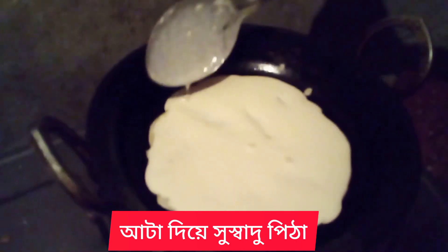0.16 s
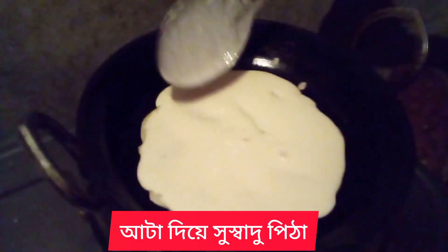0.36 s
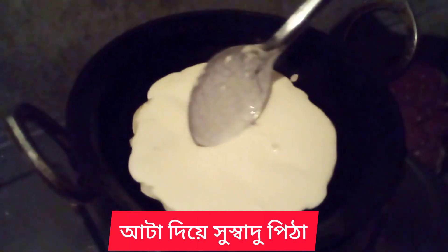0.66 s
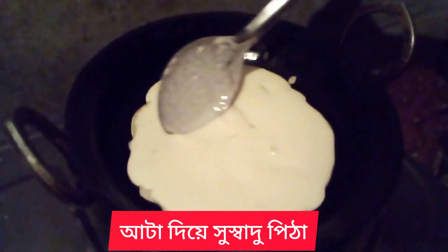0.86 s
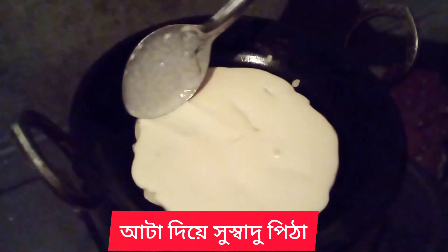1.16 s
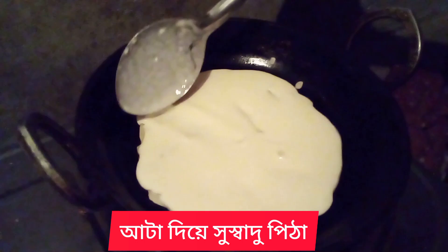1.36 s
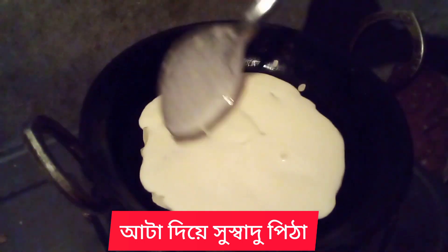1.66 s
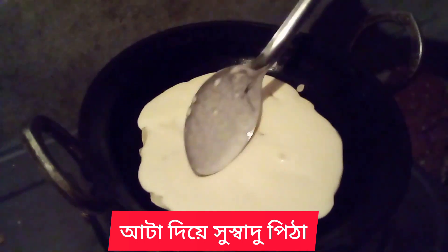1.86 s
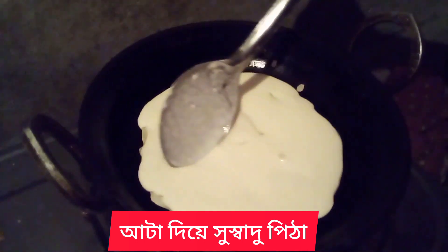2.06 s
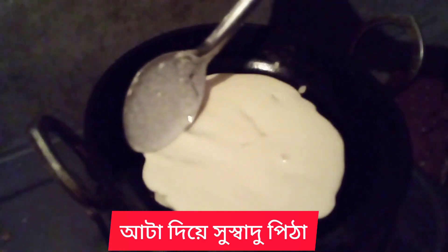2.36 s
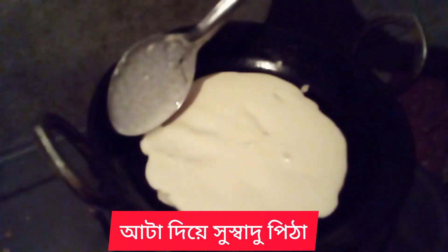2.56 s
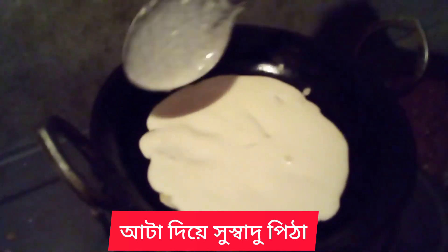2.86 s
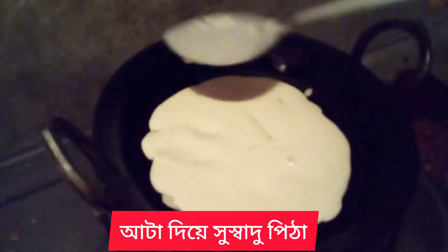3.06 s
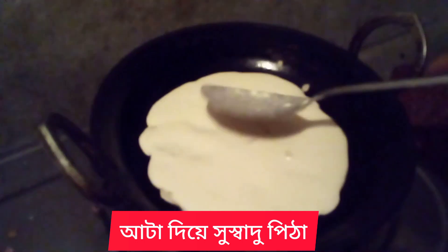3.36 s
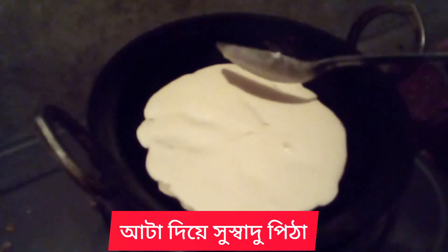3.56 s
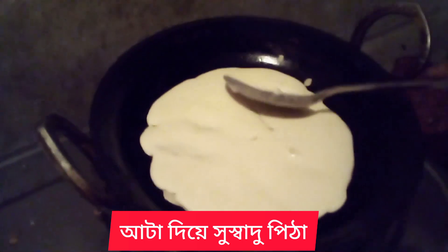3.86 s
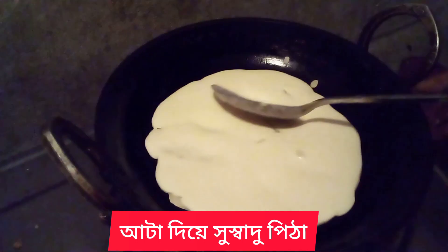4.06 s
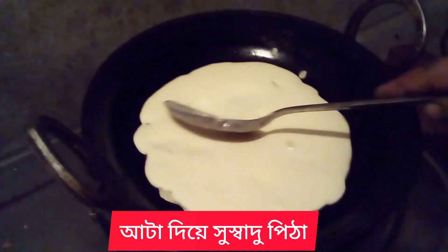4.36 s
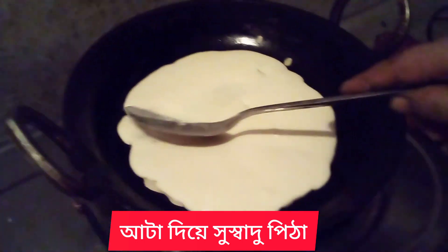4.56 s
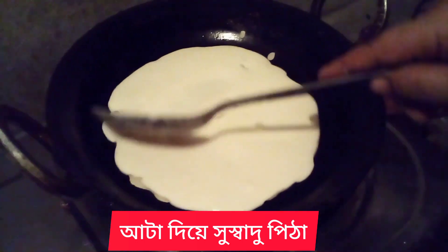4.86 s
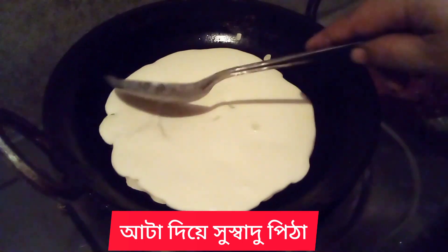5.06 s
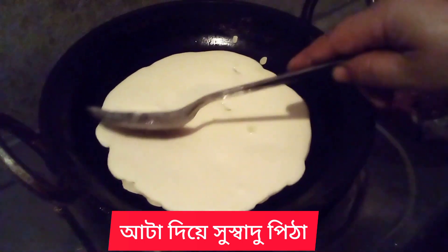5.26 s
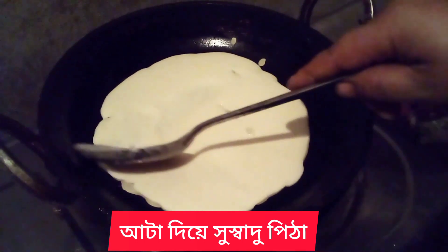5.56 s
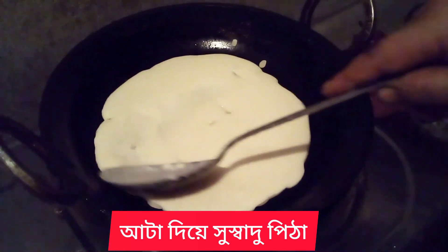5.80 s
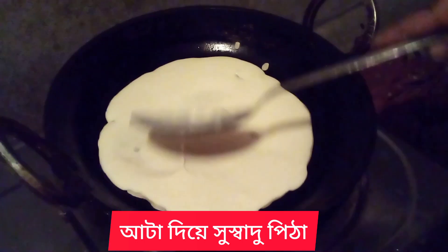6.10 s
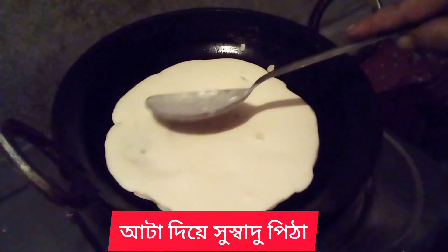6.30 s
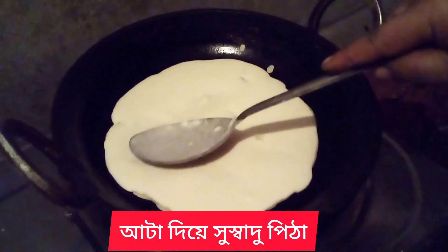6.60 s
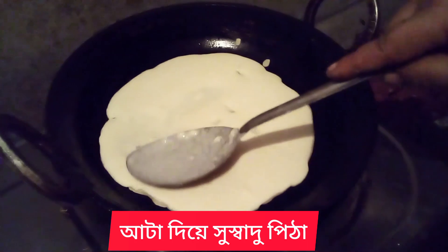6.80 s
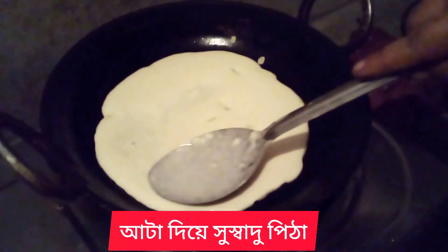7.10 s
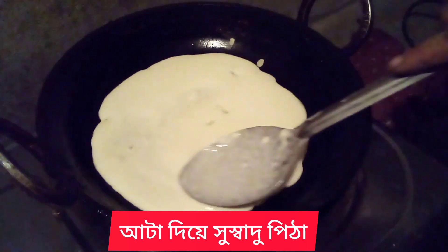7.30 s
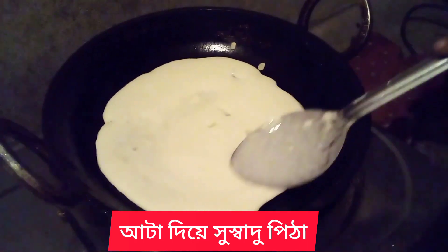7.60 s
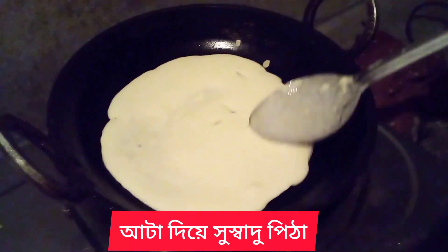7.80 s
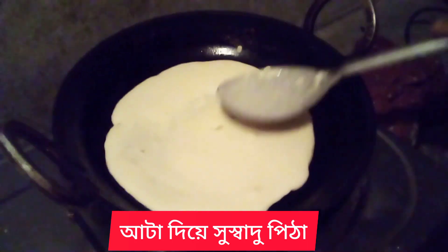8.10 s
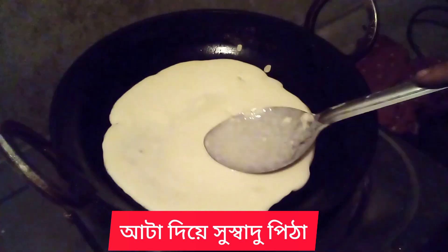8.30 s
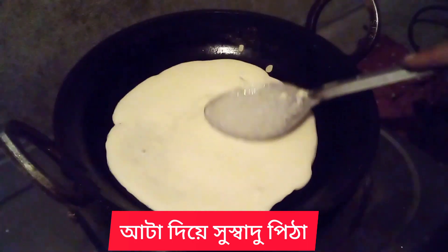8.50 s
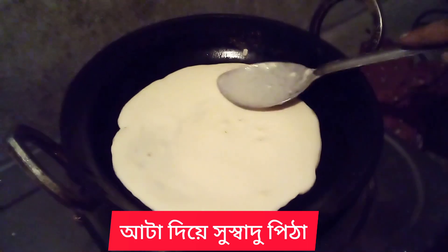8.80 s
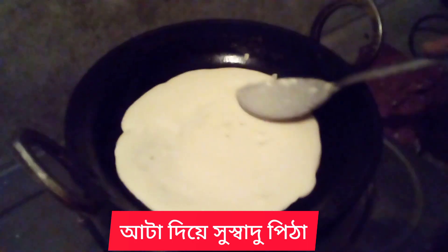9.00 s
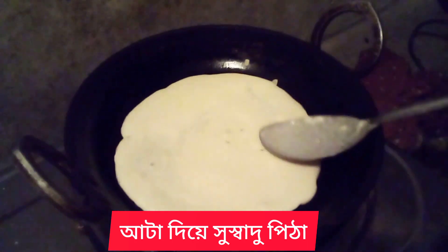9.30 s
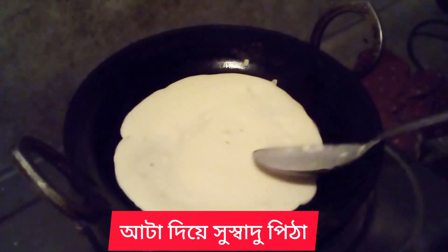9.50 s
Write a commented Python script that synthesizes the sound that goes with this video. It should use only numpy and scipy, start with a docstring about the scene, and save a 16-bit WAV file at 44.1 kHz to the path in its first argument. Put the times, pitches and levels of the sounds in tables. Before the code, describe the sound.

Close to an iron pan in a small kitchen, batter hisses in waves each time its wet edge is spread onto hot metal. The first few surges give way to a softer stretch of crackling, before the sizzle returns in several more swells. Single droplets snap and small bubbles tick and faintly ring the iron. A soft low rumble of room air lies underneath.

```python
"""Thin batter frying in an iron pan

A small kitchen, one microphone close to the hot pan, while a spoon pushes the batter outwards.
Each time the wet edge reaches bare metal, tiny steam bubbles burst in a surge that thins to a crackle.
Larger bubbles ring the iron and single droplets spit; under it all lie low room noise and a soft rumble."""
import sys
import numpy as np
from scipy import signal
from scipy.fft import rfft, irfft, next_fast_len
from scipy.io import wavfile
from scipy.ndimage import map_coordinates

SR = 44100
rng = np.random.default_rng(int(sys.argv[2]) if len(sys.argv) > 2 else 0)


def wav_record(signal):
    """Record a signal, one row per channel, as 16-bit PCM in the file named by sys.argv[1]."""
    frames = np.transpose(np.atleast_2d(signal))
    bounded = np.clip(frames, -1, 1)
    # unit amplitude maps onto the largest positive 16-bit level
    quanta = np.round(bounded * 32767).astype(np.int16)
    wavfile.write(sys.argv[1], SR, quanta)


N = 425565

# quiet frying between the surges: time_s, level_db, spray_relative_db, crackle_relative_db
QUIET_FRYING = [(0, -34, 1, -1.5), (0.95, -37, -0.5, -3.5), (1.17, -42, 0, -4), (2.35, -41.5, 3.5, -1),
                (3.05, -36.5, 2.5, -2.5), (3.6, -39, -3, -2.5), (4.3, -39.5, 0, -1.5),
                (4.55, -44.5, -1.5, -4), (6.85, -48.5, 1.5, -5), (9.65, -45.5, 2, -4.5)]


def amp(db):
    """Decibels to gain."""
    return 10 ** (np.asarray(db) / 20)


def unit(x):
    """Scale to rms 1."""
    return x / np.sqrt(np.mean(x ** 2) + 1e-20)


def curves(rows):
    """One value per sample for each column after the time."""
    time_s, *columns = np.transpose(rows)
    return [np.interp(np.arange(N) / SR, time_s, column) for column in columns]


def wobble(knots_per_s):
    """A smooth random curve at rms 1."""
    knots = rng.standard_normal(int(N * knots_per_s / SR) + 4)
    return unit(map_coordinates(knots, [np.arange(N) * knots_per_s / SR]))


def swell(x, centre_s, width_s):
    """x at rms 1, swelling and fading under a bell curve."""
    return np.exp(-0.5 * ((np.arange(N) / SR - centre_s) / width_s) ** 2) * unit(x)


def filtered(x, response):
    """x through a filter whose gain is a function of frequency."""
    size = next_fast_len(N + SR // 2)
    return irfft(rfft(x, size) * response(np.fft.rfftfreq(size, 1 / SR)), size)[:N]


def band(x, pitch_hz, width_hz):
    """The part of x around one pitch."""
    return filtered(x, lambda hz: 1 / (1 + (2 * (hz - pitch_hz) / width_hz) ** 4))


def coloured(x, points, size=8192):
    """Causal filter through (frequency_hz, gain_db) points, so that clicks keep their sharp front."""
    point_hz, point_db = np.transpose(points)
    hz = np.fft.rfftfreq(size, 1 / SR)
    gain = amp(np.interp(np.log(hz + 1), np.log(point_hz + 1), point_db))
    cepstrum = irfft(np.log(gain))
    cepstrum[1:size // 2] *= 2  # fold to minimum phase
    cepstrum[size // 2 + 1:] = 0
    return signal.fftconvolve(x, irfft(np.exp(rfft(cepstrum))))[:N]


def bursts(per_second, spread_db):
    """Bursting bubbles: random clicks of unequal size, with the same mean power at any rate."""
    chance = np.clip(per_second / SR, 1e-4, 1)
    sizes = amp(spread_db * np.clip(rng.standard_normal(N), -3, 2.25))
    hits = rng.random(N) < chance
    return unit(hits * sizes * rng.choice([-1, 1], N) / np.sqrt(chance))


def echoes(x, t60_s, wet_db, size=2048):
    """Direct sound plus dying reflections; bubbles burst all over the pan, so the pattern keeps changing."""
    t = np.arange(SR // 5) / SR
    blocks = np.pad(x, (0, -N % size)).reshape(-1, size)
    envelope = amp(-60 * t / t60_s) * (1 - np.exp(-t / 0.00056))
    tails = rng.standard_normal((len(blocks), len(t))) * envelope
    tails /= np.linalg.norm(tails, axis=1, keepdims=True)
    wet = signal.fftconvolve(blocks, tails, axes=1)
    positions = size * np.arange(len(blocks))[:, None] + np.arange(wet.shape[1])
    return x + amp(wet_db) * np.bincount(positions.ravel(), wet.ravel())[:N]


def boiling():
    """Levels in dB of hiss, finest spray and large bubbles: surges rise, hold and fade over quiet frying."""
    # wet batter reaches bare metal:
    # start_s, rise_s, hold_s, level_db, fade_db_per_s, spray_relative_db, large_relative_db
    surges = [(-0.15, 0.29, 0.048, -29, 35, 5, -11), (0.158, 0.14, 0.077, -33.5, 64, 5.5, -28),
              (1.225, 0.023, 0.25, -37.5, 58, 4.5, -27), (1.284, 0.13, 0.15, -29.5, 19, -2.5, -14.5),
              (2.213, 0.038, 0.028, -39.5, 67, 3.5, -7), (2.453, 0.41, 0.04, -29.5, 89, 5, -16.5),
              (2.615, 0.047, 0.015, -37, 116, 11, -11), (4.098, 0.17, 0.077, -52, 52, 13, -16),
              (5.396, 0.013, 0.025, -40, 122, 3, -13), (5.463, 0.3, 0.065, -28.7, 40.5, 3.5, -16),
              (6.971, 0.12, 0.16, -32, 22, 4.5, -17), (7.121, 0.06, 0.043, -28, 102, 4.5, -35),
              (7.582, 0.062, 0.043, -33, 23.5, 6, -17.5), (8.236, 0.033, 0.045, -39, 70, 4, -20),
              (8.933, 0.0099, 0.044, -23.5, 30, 0, -25), (9.049, 0.0046, 0.024, -24, 56, 2, -25),
              (9.19, 0.013, 0.015, -33.5, 68, 6.5, -15.5)]
    rise_exponent, spray_exponent, large_exponent = 0.55, 1.26, 0.81
    simmer_db, setting_db_per_s = -45, 1.63  # large bubbles die down as the batter sets
    t = np.arange(N) / SR
    frying_db, fine_db, _ = curves(QUIET_FRYING)
    hiss, spray, large = amp([frying_db, frying_db + fine_db, simmer_db - setting_db_per_s * t]) ** 2
    for start_s, rise_s, hold_s, level_db, fade_db_per_s, spray_relative_db, large_relative_db in surges:
        on = t > start_s
        age_s = t[on] - start_s
        rise = np.minimum(age_s / rise_s, 1) ** rise_exponent
        fade = amp(-fade_db_per_s * np.maximum(age_s - rise_s - hold_s, 0))
        power = (rise * fade) ** 2
        hiss[on] += amp(level_db) ** 2 * power
        spray[on] += amp(level_db + spray_relative_db) ** 2 * power ** spray_exponent
        large[on] += amp(level_db + large_relative_db) ** 2 * power ** large_exponent
    return 10 * np.log10([hiss, spray, large])


def sizzle(level_db, spray_relative_db):
    """Hard boiling merges tiny steam bursts into a hiss; as it calms, single crackles stand out."""
    # colour of each side of the pan at the microphone: frequency_hz, gain_db
    far = [(1500, -33), (2300, -11), (3220, -9), (3450, 0), (3660, -2.5), (4200, -1), (4950, -4.5),
           (6550, 0), (7120, 3.5), (7700, -2.5), (9500, -6.5), (12000, -10), (14600, -6.5), (15800, -7.5)]
    left = [(1500, -21.5), (2200, -18), (3150, -12), (3650, -4), (4900, -6), (5800, -4), (7100, 2),
            (7900, -3), (8700, -5.5), (9700, -4.5), (12600, -3.5), (14500, -0.5), (15800, -4.5)]
    near = [(1500, -20.5), (2800, -11.5), (3700, -2), (4700, -5), (7300, -1), (8400, -1.5), (9900, 0),
            (14000, 1.5), (15800, 0.5)]
    right = [(1500, -14), (2800, -1), (3600, 6.5), (4300, 5), (5000, -2.5), (6100, -2.5), (6900, 2),
             (8800, 3.5), (10500, -2.5), (12500, -3.5), (14300, 0), (15800, -0.5)]
    rear_right = [(1800, -43), (2400, -19), (2600, -9.5), (3200, -11), (3650, -4.5), (4300, -7),
                  (5200, -9.5), (6700, -5), (7400, 2), (9200, -1), (10400, -9.5), (12500, -7.5),
                  (14400, -10.5), (15600, -17.5)]
    # where the batter meets bare metal: time_s, side (0 far, 1 left, 2 near, 3 right, 4 rear right)
    wet_edge = [(0, 0), (5.3, 0), (5.5, 1), (6.95, 1), (7.15, 2), (8.1, 2), (8.28, 3), (8.925, 3),
                (8.94, 4)]
    vigour_db = level_db + 35
    hard_boil_db = np.maximum(vigour_db, 0)
    fizz = bursts(24000 * amp(vigour_db), spread_db=4.5 - 0.0091 * hard_boil_db)
    crackle = bursts(1600 * amp(vigour_db), spread_db=8)
    # the sharpest bursts are the brightest
    crackle = unit(coloured(crackle, [(1500, -8.0), (4000, -1.5), (8000, -1.5), (13000, 1.0)]))
    crackle_db = curves(QUIET_FRYING)[-1] - 0.3 * hard_boil_db
    clicks = echoes(fizz + amp(crackle_db) * crackle, t60_s=0.025, wet_db=-10)
    edge_side, = curves(wet_edge)
    body, spray = np.zeros(N), np.zeros(N)
    for side, colour in enumerate([far, left, near, right, rear_right]):
        share = np.clip(1 - abs(edge_side - side), 0, 1)
        sound = coloured(clicks, colour)
        treble = filtered(sound, lambda hz: 1 / (1 + (10000 / (hz + 1)) ** 16))  # above 10 kHz
        body += share * unit(sound - treble)
        spray += share * unit(treble)
    clusters_db = 0.5 * wobble(45)  # bubbles burst in clusters
    body *= amp(-0.89 + 0.69 * wobble(70))
    spray *= amp(spray_relative_db + 1.04 * wobble(70))
    return amp(level_db + clusters_db) * (body + spray)


def simmer(level_db):
    """Larger bubbles break under the batter, sound in the bowl of the pan and make its iron ring."""
    # colour of large bubbles in the bowl: frequency_hz, gain_db
    bowl = [(150, -20.5), (400, -13.5), (660, -8.5), (740, -12.5), (880, -22.5), (1000, -9.5), (1480, -5.5),
            (2300, -2.5), (3500, -4.5), (5000, -62)]
    # resonances of the filled pan: pitch_hz, gain_db
    pan_modes = [(590, -3), (680, -7.5), (980, 0.5), (1105, -3), (1410, 2.5), (1535, 5.5), (1700, 0.5),
                 (1835, 0), (2155, -2), (2593, 2), (3010, 4), (3440, 6)]
    loss = 0.029  # width of each resonance as a share of its frequency

    def iron(hz):
        """The summed response of the damped resonances."""
        return sum(amp(gain_db) * 1j * hz * loss * pitch_hz
                   / (pitch_hz ** 2 - hz ** 2 + 1j * hz * loss * pitch_hz)
                   for pitch_hz, gain_db in pan_modes)

    bubbles = echoes(bursts(4000, spread_db=4), t60_s=0.17, wet_db=1)
    ring = filtered(bursts(3000, spread_db=5.5), iron)
    return amp(level_db) * (amp(-2.5) * unit(coloured(bubbles, bowl)) + amp(-3.5) * unit(ring))


def room_noise():
    """A low murmur of air, with a few soft rumbling swells and a hum that rises and fades twice."""
    # colour of the kitchen air: frequency_hz, gain_db
    air_colour = [(20, -40), (36, -21.5), (52, 5), (66, -6.5), (85, 3.5), (105, -1.5), (150, -4.5),
                  (260, -9), (380, -6.5), (600, -11.5), (800, -18), (1100, -12.5), (2500, -27)]
    # loudness of that air: time_s, level_db
    air_level = [(0, -55.5), (3, -55), (5.0, -57), (7, -56.5), (9.1, -56), (9.5, -64.5), (9.65, -71.5)]
    # soft low swells: centre_s, width_s, level_db, pitch_hz, width_hz
    rumbles = [(1.9, 0.08, -59, 290, 380), (3.75, 0.4, -53, 88, 105), (3.61, 0.09, -52.5, 270, 600),
               (4.05, 0.06, -47.5, 300, 700), (5.28, 0.1, -59, 365, 85), (6.65, 0.15, -64, 385, 70)]
    # brief low hums: start_s, level_db
    hums = [(3.485, -45.5), (4.0, -60)]
    hum_hz, rise_s, fade_db_per_s = 85.6, 0.089, 33
    air_db, = curves(air_level)
    out = amp(air_db) * unit(coloured(rng.standard_normal(N), air_colour))
    for centre_s, width_s, level_db, pitch_hz, width_hz in rumbles:
        rumble = band(rng.standard_normal(N), pitch_hz, width_hz)
        out += amp(level_db) * swell(rumble, centre_s, width_s)
    hum = unit(np.sin(2 * np.pi * np.cumsum(hum_hz + 3.6 * wobble(18)) / SR))
    for start_s, level_db in hums:
        age_s = np.arange(N) / SR - start_s
        rise = np.clip(age_s / rise_s, 0, 1)
        out += rise * amp(level_db - fade_db_per_s * np.maximum(age_s - rise_s, 0)) * hum
    return out


def pitched_sizzle():
    """The sizzle gathers briefly around one pitch, which wanders as the batter flows: bubbles of like size
    burst together, or one of the pan's resonances sounds out more strongly for a while."""
    # brief gatherings of the sizzle around one pitch (like-sized bubbles, or a pan resonance sounding out):
    # centre_s, width_s, level_db, pitch_hz
    pitch_bands = [(0.11, 0.074, -43, 2100), (0.17, 0.22, -35.5, 8300), (0.918, 0.17, -47, 4100),
                   (1.487, 0.14, -46, 2180), (1.686, 0.2, -42, 2990), (1.77, 0.18, -38.5, 5200),
                   (2.827, 0.051, -33.5, 6100), (3.8, 0.83, -58.5, 1440), (5.425, 0.014, -41.5, 5840),
                   (6.5, 0.44, -55.5, 3760)]
    drift_octaves = 0.05
    out = np.zeros(N)
    for centre_s, width_s, level_db, pitch_hz in pitch_bands:
        position = np.cumsum(2 ** (drift_octaves * wobble(9))) % N
        bubbles = band(bursts(5000, spread_db=1), pitch_hz, width_hz=0.27 * pitch_hz)
        drifting = np.interp(position, np.arange(N), bubbles)
        out += amp(level_db) * swell(drifting, centre_s, width_s)
    return out


def spits():
    """Each droplet or single bubble snaps, rings briefly and throws a puff of spray around its pitch."""
    # spitting droplets: start_s, snap_peak_db, pitch_hz
    droplets = [(1.0062, -7, 12700), (2.015, -14, 14000), (2.2263, -14, 15000), (2.4403, -16.5, 7500),
                (2.4605, -7.5, 6950), (2.4607, -6.5, 14000), (2.6735, -6, 14200), (3.0952, -13.5, 8050),
                (3.538, -13, 12500), (4.9548, -27, 13000), (5.0936, -24, 8000), (5.2032, -25, 14000),
                (5.3873, -16, 13000), (5.399, -18, 13000), (5.4225, -12, 14500), (5.4486, -13, 14000),
                (6.0298, -12.5, 14500), (6.1098, -22, 9000), (6.234, -22, 12400), (6.4375, -24, 13000),
                (6.458, -18, 13500), (6.881, -24, 10000), (8.4117, -13, 14000)]
    # single bubbles that burst with a pitched tick: start_s, snap_peak_db, pitch_hz
    pings = [(0.7576, -18, 6060), (0.7582, -15, 15200), (2.015, -20, 5960), (3.9841, -15.5, 11400),
             (4.6442, -19, 15400), (8.4218, -25, 4100), (8.7947, -26.5, 5230)]
    droplet_cycles, ping_cycles = 0.72, 4.2  # decay times of the ring
    puff_db, puff_tilt_db = -6.5, 4  # the tilt is the drop one octave from the pitch
    out, t = np.zeros(N + SR), np.arange(SR // 25) / SR
    hz = np.fft.rfftfreq(len(t), 1 / SR)
    highpass = signal.butter(3, 2400, "high", fs=SR, output="sos")
    puff_decay = np.exp(-t / 0.00064) + amp(-15.5) * np.exp(-t / 0.015)
    puff_envelope = puff_decay * (1 - np.exp(-t / 0.000089))
    snap_attack = 1 - np.exp(-t / 0.00005)
    for events, cycles in [(droplets, droplet_cycles), (pings, ping_cycles)]:
        for start_s, snap_peak_db, pitch_hz in events:
            ring = np.sin(2 * np.pi * pitch_hz * t) * np.exp(-t * pitch_hz / cycles)
            snap = signal.sosfilt(highpass, ring * snap_attack)
            puff_colour = amp(-puff_tilt_db * np.log2((hz + 1) / pitch_hz) ** 2)
            puff = unit(irfft(rfft(rng.standard_normal(len(t))) * puff_colour, len(t)))
            spit = snap / abs(snap).max() + amp(puff_db) * puff_envelope * puff
            out[round(start_s * SR):][:len(t)] += amp(snap_peak_db) * spit
    return out[:N]


def scene():
    """The pan close up in a small kitchen; one microphone feeds both channels."""
    hiss_db, spray_db, large_db = boiling()
    pan = sizzle(hiss_db, spray_db - hiss_db) + pitched_sizzle() + simmer(large_db) + spits()
    kitchen = echoes(pan, t60_s=0.4, wet_db=-10) + room_noise()
    return np.tile(kitchen, (2, 1))


def record(dry):
    """The recorder keeps nothing above its band limit."""
    top_hz = 15900
    return np.array([filtered(channel, lambda hz: hz < top_hz) for channel in dry])


dry = scene()
out = record(dry)
wav_record(out)
```